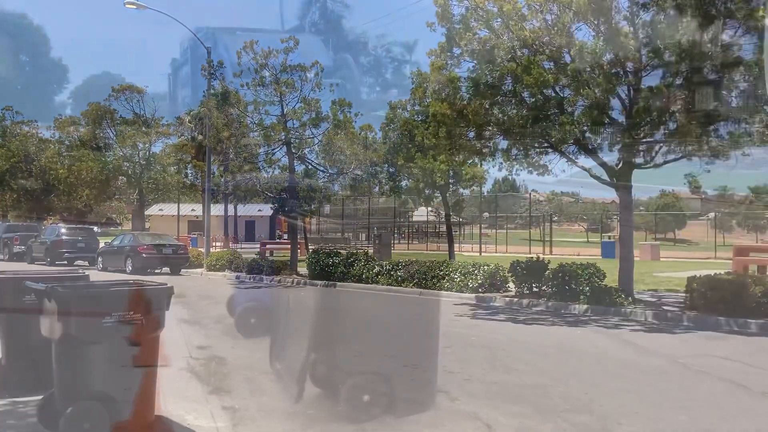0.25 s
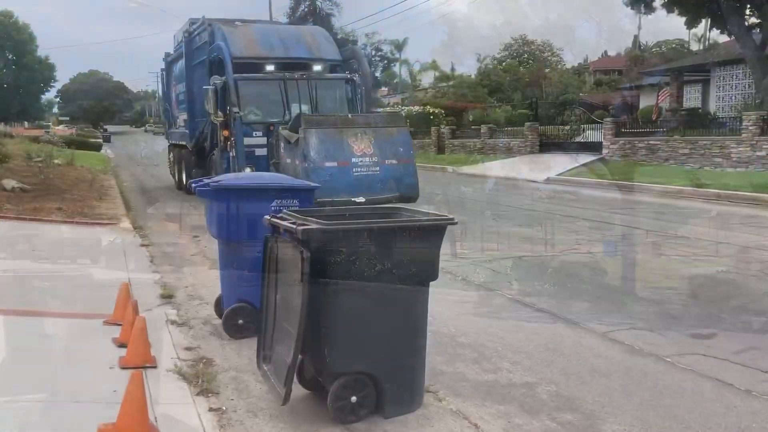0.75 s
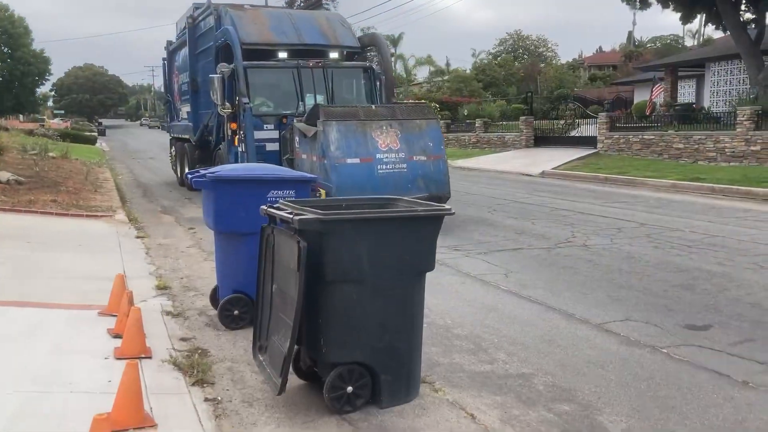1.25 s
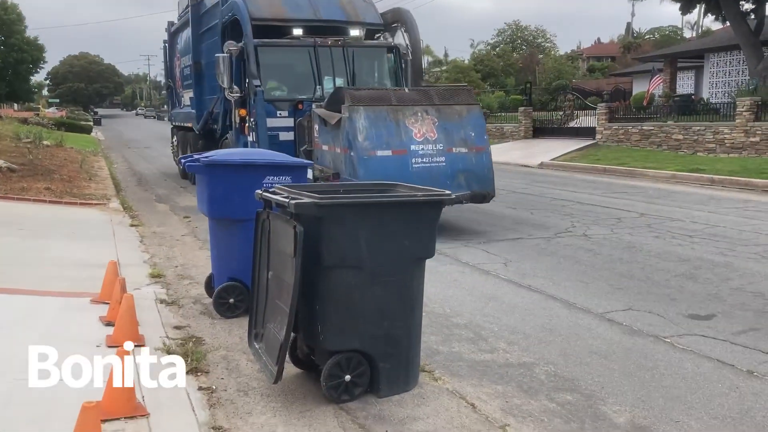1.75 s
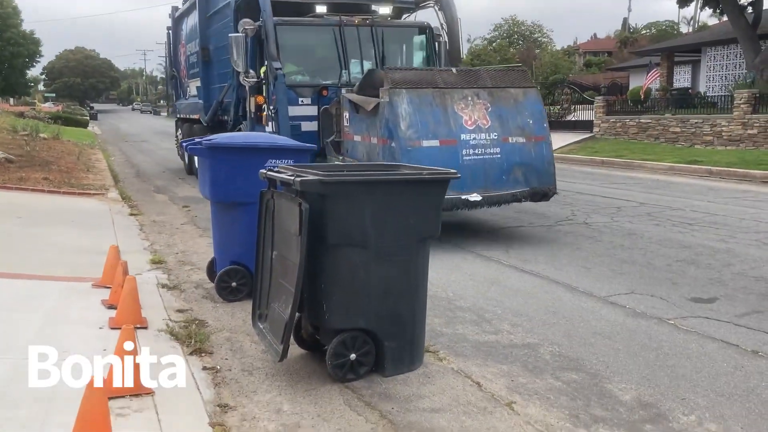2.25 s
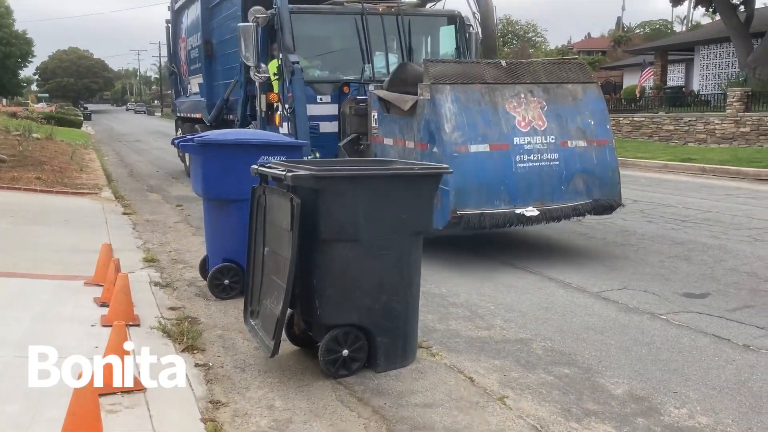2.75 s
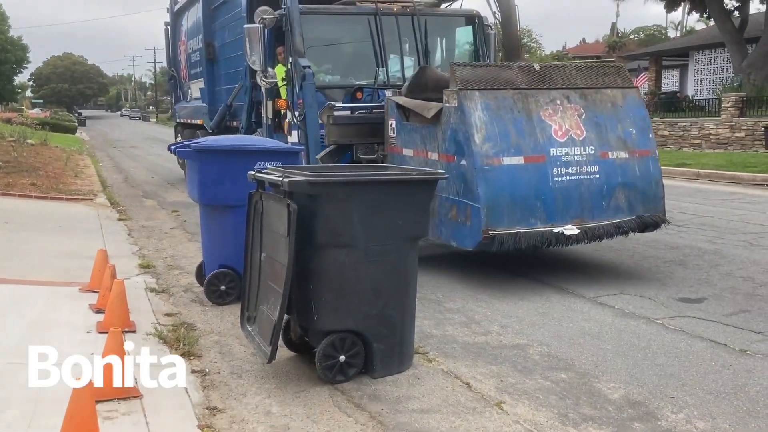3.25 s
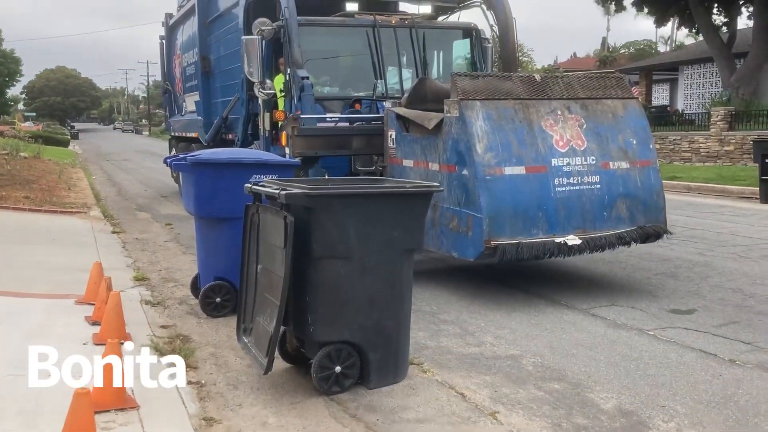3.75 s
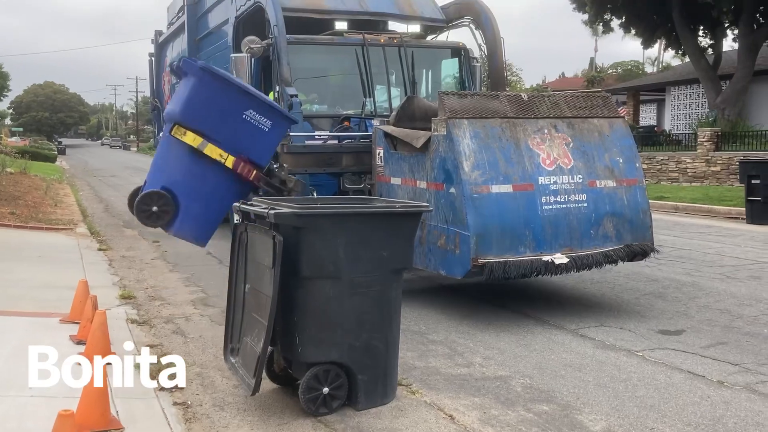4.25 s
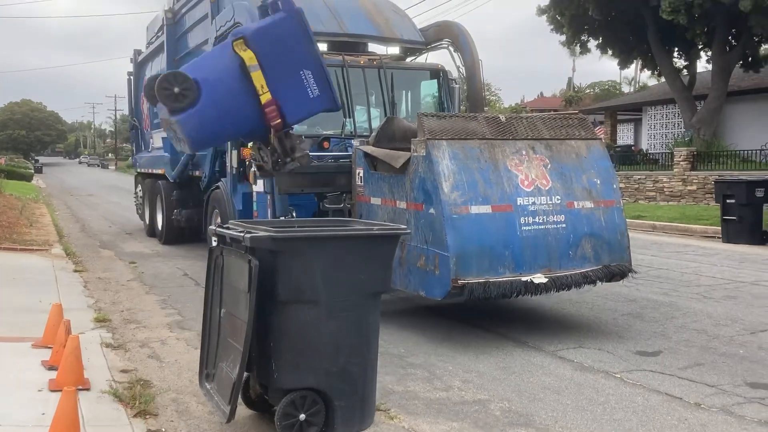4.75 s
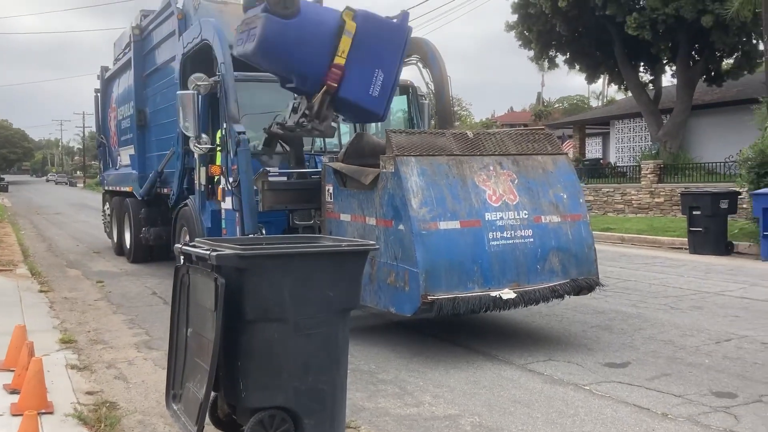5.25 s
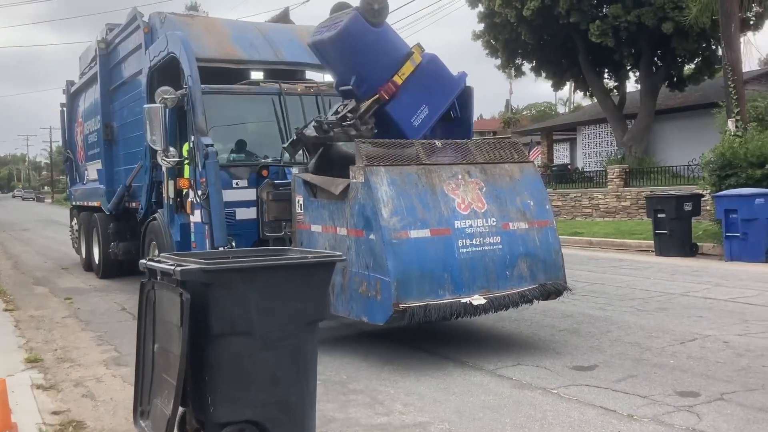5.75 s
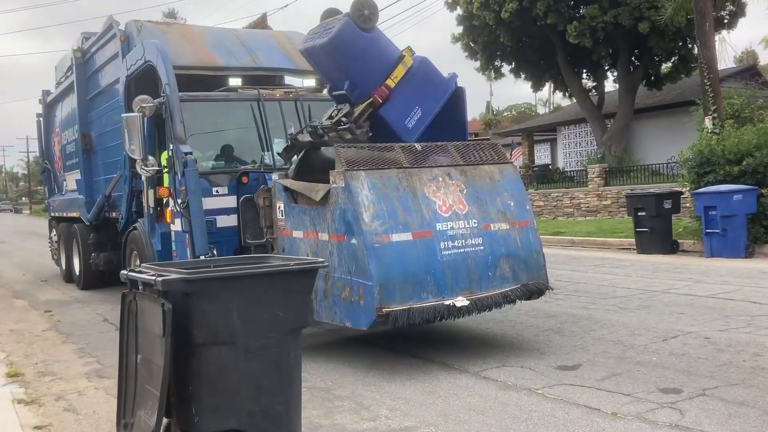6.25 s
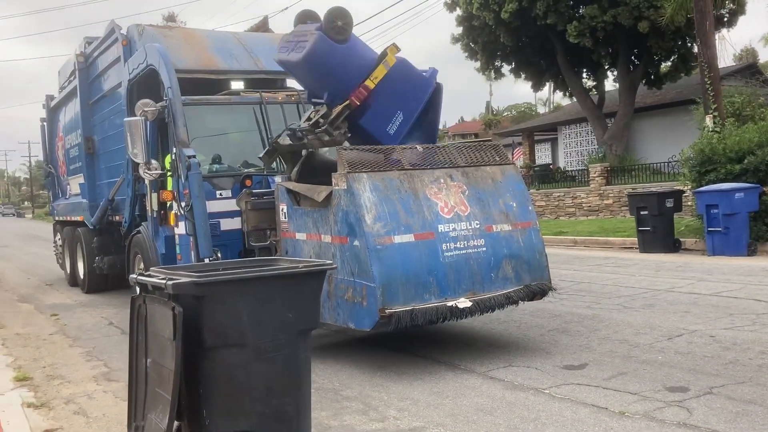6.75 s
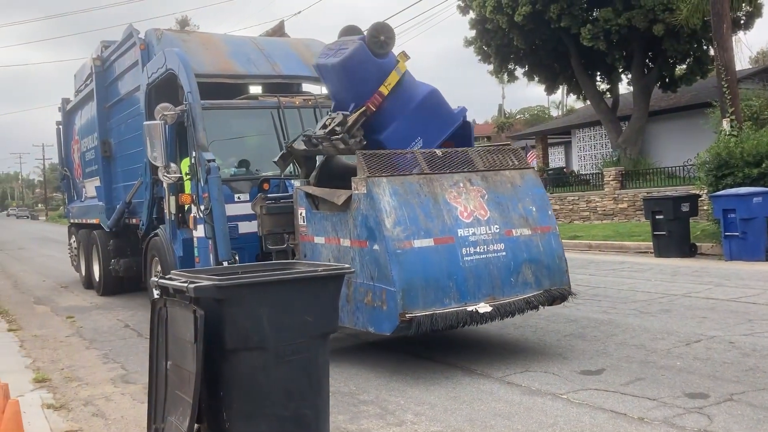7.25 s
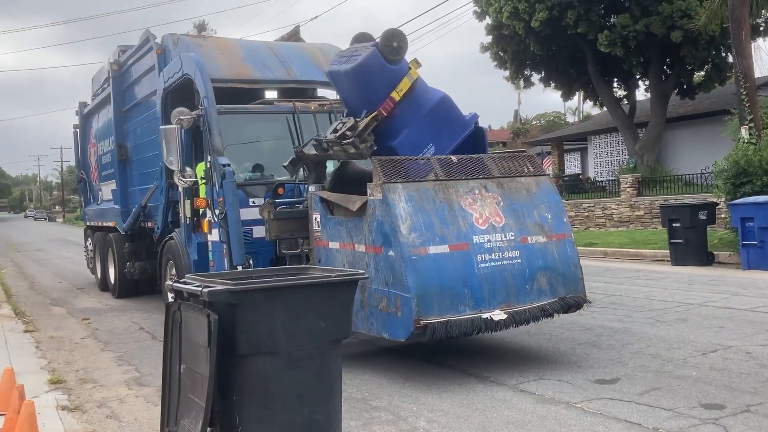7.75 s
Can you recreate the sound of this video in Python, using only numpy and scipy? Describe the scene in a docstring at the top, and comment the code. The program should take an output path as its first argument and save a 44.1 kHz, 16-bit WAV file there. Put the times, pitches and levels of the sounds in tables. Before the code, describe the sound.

Garbage truck engine roar stops abruptly, then quiet idling, brake squeal and air hiss, hollow plastic knocks, humming lift, and loud rattling cart shakes.

```python
"""A refuse truck pulls away close on the right, firing tone under a pulsing roar, and breaks off abruptly.
Another idles up the street and brakes with squeals, which are gliding tones, and a blast of air, a noise jet.
Its arm grips a plastic cart with knocks that ring the cart walls, then lifts it on a humming pump.
It shakes the cart out over a steel hopper: lumpy noise rings truck body and cart, rubbish tumbles,
and the steel grille rattles. Two microphone ports hear it all with short street echoes."""
import sys
import numpy as np
from scipy import signal
from scipy.fft import rfft, irfft, next_fast_len
from scipy.io import wavfile
from scipy.ndimage import map_coordinates

SR = 44100
rng = np.random.default_rng(int(sys.argv[2]) if len(sys.argv) > 2 else 0)


def transcribe(u):
    """Save the signal u as a 16-bit wav file named by the first command-line argument.

    u: samples, shape (n,) or (channels, n), limited to [-1, 1]; the rate is SR.
    q: integer samples, one column per channel.
    """
    v = np.clip(np.atleast_2d(u).T, -1, 1)
    q = np.round(v * 32767).astype(np.int16)
    wavfile.write(sys.argv[1], SR, q)


N = 353152  # length in samples

# blows of arm and cart: start_s, level_db, drum_db (relative to level_db)
KNOCKS = [(2.578, -18.5, -24), (2.6, -13, -0.5), (2.702, -15, -14), (2.8996, -15.5, -9),
          (3.3905, -20.5, -20), (3.859, -10.5, 4.5), (3.9, -27, -5), (3.977, -19, -11), (3.9948, -20, 1),
          (4.0038, -21, 4), (4.0622, -13.5, -8), (4.178, -19.5, -11.5), (5.1152, -26.5, -26),
          (5.4267, -21.5, -21), (5.5224, -18.5, -30), (5.7131, -30.5, 12), (5.9837, -5.5, -9.5),
          (6.0202, -10.5, 1), (6.2657, -26, 19), (6.523, -6.5, 4.5), (6.7104, -22.5, 7),
          (6.772, -12.5, -15), (6.824, -18.5, -9), (6.8996, -21, 4), (7.0786, -2.5, -3),
          (7.1687, -3.5, 2.5), (7.206, -6.5, 2.5), (7.3304, -4, 2), (7.451, -7.5, 8), (7.4776, -7.5, 4),
          (7.6313, -6, -4), (7.7182, 0, 1), (7.763, -3.5, 2), (7.9367, -7.5, -32)]
# resonances of the cart walls: pitch_hz, width_hz, level_db
CART_WALLS = [(247, 94, 2.5), (335, 106, 5), (423.7, 67.6, 4.5), (578.6, 84, 1), (812, 74, -6),
              (1103, 224, -11.5)]


def blows():
    """Impact excitation: a broadband contact burst, then damped wall modes, slightly detuned at each blow."""
    t = np.arange(SR // 4) / SR
    bright, dull = np.zeros(N + SR), np.zeros(N + SR)
    for start_s, level_db, drum_db in KNOCKS:
        burst = rng.standard_normal(len(t))
        hollow = 0
        for hz, width_hz, mode_db in CART_WALLS:
            gain = amp(mode_db + rng.normal(0, 2.9))
            decay = np.exp(-.8 * np.pi * width_hz * t)
            turn = 2 * np.pi * (hz * rng.normal(1, 0.054) * t + rng.random())
            hollow = hollow + gain * decay * np.sin(turn)
        # a crack that loses 60 dB in 36 ms, with a weaker burst that takes 110 ms
        fade = amp(-60 * t / 0.036) + 0.1 * amp(-60 * t / 0.11)
        fade *= 1 - np.exp(-t / 0.0016)
        at = round(start_s * SR)
        bright[at:][:len(t)] += amp(level_db + 0.5) * burst * fade
        dull[at:][:len(t)] += amp(level_db + drum_db) * hollow * (1 - np.exp(-t / 0.008))

    def contact(hz):  # first-order band from 500 to 2900 Hz
        return 1j * hz / (500 + 1j * hz) / (1 + 1j * hz / 2900)

    return filtered(bright[:N], contact) + dull[:N]


# jolts of arm and cart: start_s, drum_db, boom_db, hold_s
JOLTS = [(2.578, -28.5, -20, 0.097), (2.69, -34.5, -30, 0.024), (3.854, -22, -22, 0.058),
         (3.974, -18, -13.5, 0.016), (4.136, -62, -19.5, 0.018), (4.403, -43.5, -25.5, 0.022),
         (5.4, -35.5, -27, 0.21), (6.006, -17.5, -13.5, 0.022), (6.261, -22, -18, 0.022),
         (6.521, -19, -11.5, 0.023), (7.068, -18.5, -18, 0.0064), (7.182, -16, -14, 0.036),
         (7.328, -20, -15.5, 0.097), (7.427, -17.5, -19, 0.047), (7.714, -16, -15, 0.038),
         (7.895, -26.5, -47, 0.04)]


def swells(levels_db, rise_s, fall_db_per_s, bed_db):
    """Energy summation: jolts add in power to a bed that rises and falls with the arm's shudder."""
    power, t = amp(bed_db) ** 2, np.arange(N) / SR
    for (start_s, *_, hold_s), db in zip(JOLTS, levels_db):
        since = np.maximum(t - start_s, 0)
        fall_db = fall_db_per_s * np.maximum(since - rise_s - hold_s, 0)
        jolt = amp(db - fall_db) * np.minimum(since / rise_s, 1)
        power = power + jolt ** 2
    return np.sqrt(power)


# shudder of the working arm: time_s, boom_db
SHUDDER = [(2.56, -89.5), (2.6, -35), (2.85, -28), (3.4, -33), (4.3, -34.5), (5.0, -35), (5.38, -36),
           (5.45, -27.5), (5.96, -31), (6.22, -28), (6.93, -23.5), (7.06, -16), (7.45, -22.5),
           (7.65, -22.5), (8.01, -27.5)]
# resonances of the truck body: pitch_hz, width_hz, level_db
TRUCK_BODY = [(52, 22.8, -3), (79.5, 21.6, 2.5), (119.1, 34.4, -4), (190.5, 47.2, -9)]
# spectrum of tumbling rubbish: frequency_hz, density_db (per Hz)
RUBBISH = [(500, 7.5), (900, 2.5), (2500, 0), (4500, -10), (7000, -12), (10000, -14), (12000, -19)]
SHUDDER_DRUM_DB, SHUDDER_TUMBLE_DB = -12, -17.5  # relative to the boom
JOLT_TUMBLE_DB = -8  # relative to the drumming
CALM_DB, WILD_DB = -50.5, -17.5  # shudder levels that set how busy the load is
BOOM_RISE_S, BOOM_FALL_DB_PER_S = 0.044, 86
DRUM_RISE_S, DRUM_FALL_DB_PER_S = 0.0047, 103
TUMBLE_RISE_S, TUMBLE_FALL_DB_PER_S = 0.0059, 154
BITS_DB = -4  # loose pieces relative to the rustle, when the load is at its wildest


def shaking():
    """Forced vibration: lumpy drive excites body and cart resonances while rubbish tumbles in small knocks."""
    shudder_db, = curves(SHUDDER)
    drum_db, boom_db = np.transpose(JOLTS)[1:3]
    # the boom is weakened below about 30 Hz
    boom = noise(lambda f: modes(TRUCK_BODY)(f) * f / (f + 30), grain_db=2.5, grain_rate=15)
    drum = noise(modes(CART_WALLS), grain_db=2.0, grain_rate=27)
    # harder shaking, lumpier load
    busy = np.clip((shudder_db - CALM_DB) / (WILD_DB - CALM_DB), .3, 1)
    rustle = noise(lambda f: along(RUBBISH, f), grain_db=6.8 * busy, grain_rate=36)
    tumble = rustle + amp(BITS_DB) * busy * bits()
    boom_gain = swells(boom_db, BOOM_RISE_S, BOOM_FALL_DB_PER_S, shudder_db)
    drum_gain = swells(drum_db, DRUM_RISE_S, DRUM_FALL_DB_PER_S, shudder_db + SHUDDER_DRUM_DB)
    tumble_gain = swells(drum_db + JOLT_TUMBLE_DB, TUMBLE_RISE_S, TUMBLE_FALL_DB_PER_S,
                         shudder_db + SHUDDER_TUMBLE_DB)
    return boom * boom_gain + drum * drum_gain + tumble * tumble_gain


# random impacts: mean rate, median pitch and its spread, cycles to fall 60 dB, scatter of size
BITS_PER_S, BIT_HZ, BIT_OCTAVES, BIT_CYCLES, BIT_SCATTER_DB = 230, 2200, .8, 50, 2


def bits():
    """Poisson impacts: loose pieces knock at random, each a short damped ring of its own pitch; rms 1."""
    draw = rng.random(size=(3000, 2))
    at_s = np.cumsum(-np.log(draw[:, 0])) / BITS_PER_S  # exponential waiting times
    hz = np.clip(BIT_HZ * 2 ** (BIT_OCTAVES * rng.standard_normal(len(at_s))), 300, 9000)
    hz = hz[at_s < N / SR, None]
    size = amp(-BIT_SCATTER_DB * np.log(draw[:len(hz), 1:2]))
    k = np.arange(SR // 40)
    rings = size * np.sin(2 * np.pi * hz * k / SR) * amp(-60 * hz * k / SR / BIT_CYCLES)
    where = np.round(at_s[:len(hz), None] * SR).astype(int) + k
    return unit(np.bincount(where.ravel(), rings.ravel(), N + SR)[:N])


# small hard clacks: start_s, level_db, pitch_hz
CLACKS = [(2.81, -48, 3100), (2.876, -30, 3140), (3.352, -35, 1690), (3.569, -30, 1614), (3.615, -28, 1694),
          (4.433, -41, 1400), (4.456, -25, 652), (4.72, -39, 840), (5.409, -28.5, 1240),
          (5.563, -28.5, 1670), (5.631, -40, 1430), (5.899, -42, 4300), (7.12, -25, 1980),
          (7.362, -27, 3140)]


def clacks():
    """Modal density: each clack sums many very short modes scattered around its pitch."""
    t, out = np.arange(SR // 10) / SR, np.zeros(N + SR)
    for start_s, level_db, hz in CLACKS:
        cluster = hz * 2 ** rng.normal(0, .6, size=(24, 1))
        ring = unit(np.sin(2 * np.pi * cluster * t).sum(axis=0))
        ring = ring * amp(-60 * t / .055)  # falls 60 dB in 55 ms
        out[round(start_s * SR):][:len(t)] += amp(level_db) * ring * (1 - np.exp(-t / 0.0011))
    return out[:N]


# rattles of the hopper's steel grille after a shake: start_s, level_db
RATTLES = [(6.04, -24), (6.27, -32.5), (6.55, -26), (7.21, -23.5), (7.44, -25.5), (7.76, -27)]
# lower mode of each pair in the steel: pitch_hz, level_db
STEEL = [(2000, -1.5), (2780, -9), (3150, -1), (3470, 1), (4026, 1), (4331, -7.5), (5050, 1.5), (6128, -1),
         (7842, -6)]
RATTLE_RISE_S, RATTLE_T60_S = .04, .5


def grille():
    """Chattering contact: lumpy noise drives each pair of steel modes; rattles swell and decay after shakes."""
    t = np.arange(N) / SR
    chatter = 0
    for start_s, level_db in RATTLES:
        since = np.maximum(t - start_s, 0)
        chatter = chatter + amp(level_db - 60 * since / RATTLE_T60_S) * np.minimum(since / RATTLE_RISE_S, 1)
    steel = 0
    for hz, level_db in STEEL:
        pair = modes([(hz, 32, 0), (1.087 * hz, 32, -4)])
        steel = steel + amp(level_db) * noise(pair, grain_db=4, grain_rate=25)
    return chatter * unit(steel)


# spectrum of the air jet: frequency_hz, density_db (per Hz)
JET = [(1200, -12), (2000, -0.5), (4500, 3.5), (6500, -1.5), (9000, 3.5), (12000, 2.5)]
AIR_S, AIR_RISE_S, AIR_HOLD_S, AIR_SHUT_S = 3.098, 0.03, 0.04, 3.86  # valve opens, rise, hold, shut
AIR_DB, AIR_FALL_DB_PER_S, LEAK_DB = -25, 105, -44  # blast, its fall, lingering leak


def air():
    """Jet noise: brake air opens fast, holds, decays exponentially to a leak and shuts."""
    t = np.arange(N) / SR
    blast = amp(AIR_DB - AIR_FALL_DB_PER_S * np.maximum(t - AIR_S - AIR_RISE_S - AIR_HOLD_S, 0))
    leak = amp(LEAK_DB) * np.clip((AIR_SHUT_S - t) / AIR_RISE_S, 0, 1)
    opening = np.clip((t - AIR_S) / AIR_RISE_S, 0, 1) ** 2
    hiss = noise(lambda f: along(JET, f), grain_db=0, grain_rate=78)
    return opening * np.hypot(blast, leak) * hiss


# gear whine, engine and pump hum, brake and joint squeals:
# start_s, end_s, start_pitch_hz, end_pitch_hz, level_db, width_hz
TONES = [(0, .38, 1480, 1550, -38, 60), (.37, .55, 1555, 1600, -33, 22), (0, .52, 2755, 2960, -40, 30),
         (0, .27, 2970, 3090, -40, 45), (.1, .75, 360, 412, -30, 8), (0.949, 3.6, 80.73, 84.9, -39, 1.72),
         (0.949, 2.6, 402, 400, -57, 8), (0.951, 3.096, 563, 577, -60, 12), (4.3, 6.796, 72, 77, -25, 1.69),
         (4.5, 5.5, 122, 128.2, -34, 7), (6.9, 8.097, 82, 88, -26, 5.3), (2.74, 2.96, 5870, 5780, -47, 70),
         (2.89, 3.1, 5580, 5690, -47, 110), (2.93, 3.115, 9840, 9960, -49, 160),
         (3.266, 3.8, 9950, 9800, -47, 600), (3.3, 3.75, 4340, 4320, -48, 240),
         (3.2, 3.8, 4060, 3970, -47, 300), (3.7, 3.875, 4360, 3980, -41, 130),
         (2.9, 3.1, 11200, 11420, -55, 110), (4.969, 5.26, 4590, 4410, -57, 700)]


def tones(rows):
    """Narrow-band modulation: each tone glides and wavers; a wide one is a breathy whistle."""
    out = np.zeros(N + SR)
    for start_s, end_s, start_hz, end_hz, level_db, width_hz in rows:
        n = round((end_s - start_s) * SR)
        drift_hz = 0.427 * min(width_hz, 90) * wobble(13.88, size=n)
        turn = 2 * np.pi * np.cumsum(np.linspace(start_hz, end_hz, n) + drift_hz) / SR
        waver = wobble(width_hz, size=n) + 1j * wobble(width_hz, size=n)
        if width_hz < 35:  # hums and whines of turning machinery stay steadier
            depth = .2 if width_hz < 6 else .7
            waver = 1 + depth * waver
        tone = np.real(waver * np.exp(1j * turn))
        out[round(start_s * SR):][:n] += amp(level_db) * signal.windows.tukey(n, .15) * tone
    return out[:N]


# the leaving truck: time_s, firing_hz, tone_db, roar_db
LEAVING = [(0.0, 86, -30.5, -18), (0.806, 94.6, -28, -23), (0.91, 91.3, -20.5, -21.5)]
# spectrum of its roar: frequency_hz, density_db (per Hz)
ROAR = [(18, -43), (35, -17), (92, -3), (380, -4), (800, -13.5), (2830, -31), (3700, -35.5), (8000, -49),
        (12000, -58.5)]


def leaving():
    """Periodic combustion: a wavering firing tone under a roar that pulses at half the tone's frequency."""
    firing_hz, tone_db, roar_db = curves(LEAVING)
    turn = 2 * np.pi * np.cumsum(firing_hz) / SR
    roar = noise(lambda f: along(ROAR, f), grain_db=0.0, grain_rate=30.1)
    roar = roar * (1 + 0.058 * np.sin(turn / 2))
    tone = np.sqrt(2) * amp(tone_db + 2.0 * wobble(12.8)) * np.sin(turn)
    return amp(roar_db) * roar + tone


# engine and street noise: time_s, level_db
IDLE = [(.9, -44), (2, -41), (2.5, -39.5), (4.4, -42), (8, -17.5)]
# its spectrum: frequency_hz, density_db (per Hz)
STREET = [(15, -68), (32, -6.5), (86, -2.5), (115, -8.5), (300, -18), (900, -30), (1620, -35),
          (6500, -51.5), (9500, -49), (12000, -51)]


def idling():
    """Broadband noise: engine and street, spectrally shaped, with a randomly wavering level."""
    level_db, = curves(IDLE)
    return amp(level_db + wobble(6)) * noise(lambda f: along(STREET, f), grain_db=0.0, grain_rate=25)


def street_echo(x, t60):
    """Diffuse reverberation: two unrelated, exponentially decaying tails from houses and road."""
    t = np.arange(SR // 3) / SR
    tail = rng.standard_normal((2, len(t))) * amp(-60 * t / t60)
    tail = tail / np.linalg.norm(tail[0])  # each about energy 1
    return signal.fftconvolve(x[None], tail, axes=1)[:, :N]


# microphone ports, sound from ahead: frequency_hz, left_lead_rad, unrelated_share (0 to 1)
PORTS = [(1, 0, 0.065), (417, 0.23, 0.26), (1730, 0.5, 0.35), (4500, 0.5, 0.89), (5700, 1.9, 0.23),
         (7050, 1, 0.54), (8610, -2.5, 0.067), (10700, -5, 0.029), (11600, -4, 0.51), (12600, -15, .2)]


def ports(x, leads, t60, wet):
    """Phase difference and coherence: two ports hear direct sound out of step, and unrelated echoes."""
    share_hz, _, share = np.transpose(PORTS)
    lead_hz, lead_rad = np.transpose(leads)[:2]

    def echo_part(hz):
        return np.clip(wet * np.interp(hz, share_hz, share), 0, .9)

    def direct_part(hz):  # half the lead on each side; squared direct and echo gains sum to 1
        phase = np.outer([1, -1], np.interp(hz, lead_hz, lead_rad) / 2)
        return np.sqrt(1 - echo_part(hz) ** 2) * np.exp(1j * phase)

    direct = filtered(x, direct_part)
    return direct + filtered(street_echo(x, t60), echo_part)


def amp(db):
    """Level definition: amplitude ratio from decibels."""
    return 10 ** (np.asarray(db) / 20)


def unit(x):
    """Normalisation to rms 1."""
    return x / np.sqrt(np.mean(x ** 2) + 1e-20)


def along(points, hz):
    """Spectral envelope: gain through (Hz, dB) points on a log frequency axis."""
    f, db = np.transpose(points)
    return amp(np.interp(np.log(hz + 1), np.log(f + 1), db, left=-120))


def curves(rows):
    """Linear interpolation: one value per sample for each column after the time."""
    time_s, *columns = np.transpose(rows)
    return [np.interp(np.arange(N) / SR, time_s, column) for column in columns]


def wobble(rate, size=N):
    """Band-limited fluctuation: a smooth random curve with rate knots a second."""
    knots = rng.standard_normal(size=1024)
    return map_coordinates(knots, [np.arange(size) * rate / SR], mode="wrap")


def filtered(x, response):
    """Linear filtering: the spectrum of x times a complex response of frequency."""
    m = next_fast_len(N + SR // 2)
    return irfft(rfft(x, m) * response(np.fft.rfftfreq(m, 1 / SR)), m)[..., :N]


def modes(table):
    """Modal superposition: causal response of (Hz, width Hz, dB) resonances of alternating sign."""
    def response(f):
        total = 0
        for k, (hz, width_hz, db) in enumerate(table):
            resonance = 1j * f * width_hz / (hz * hz - f * f + 1j * f * width_hz)
            total = total + (-1) ** k * amp(db) * resonance
        return total
    return response


def noise(response, grain_db, grain_rate):
    """Filtered random excitation: coloured noise of rms 1; grain_db above 0 makes its drive lumpy."""
    drive = rng.standard_normal(N) * amp(grain_db * wobble(grain_rate))
    return unit(filtered(drive, response))


# ports for sound from the far right: frequency_hz, left_lead_rad
FROM_RIGHT = [(1, 1.5), (290, -1.97), (600, -2.5), (2400, -5.5), (3900, -9.5), (6900, -13), (11500, -19)]
CUT_S = .917  # the first truck is silent from here


def scene():
    """Superposition: both trucks and the street add at the two ports."""
    early = [row for row in TONES if row[0] < .5]
    late = TONES[len(early):]
    cut = np.clip((CUT_S - np.arange(N) / SR) / 0.0014, 0, 1)  # breaks off at once
    first = cut * ports(leaving() + tones(early), FROM_RIGHT, t60=0.46, wet=0.97)
    first = first * amp([[.7], [2.2]])  # dB left, right
    working = tones(late) + air() + shaking() + blows() + clacks() + grille()
    second = ports(working, PORTS, t60=0.15, wet=0.77) * amp([[-.3], [.3]])
    return first + second + ports(idling(), PORTS, t60=0.8, wet=1)


TOP_HZ = 15900  # band limit


def record(dry):
    """Transducer limits: a microphone weaker at the top, gentle saturation of peaks, then the band limit."""
    heard = filtered(dry, lambda hz: 0.029 + 0.93 / (1 + (hz / 12200) ** 18))
    held = heard / (1 + np.abs(heard / 0.9) ** 5) ** (1 / 5)
    return filtered(held, lambda hz: hz < TOP_HZ)


dry = scene()
out = record(dry)
transcribe(out)
```